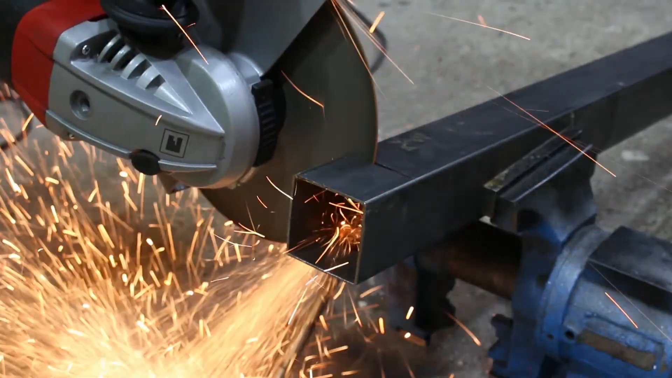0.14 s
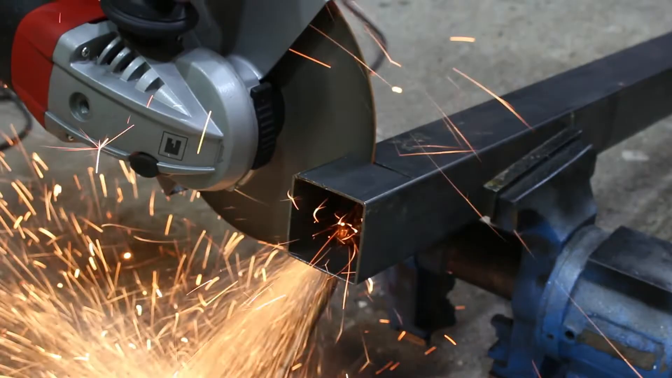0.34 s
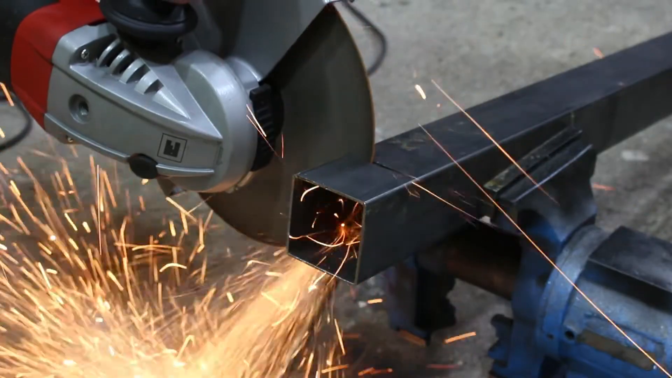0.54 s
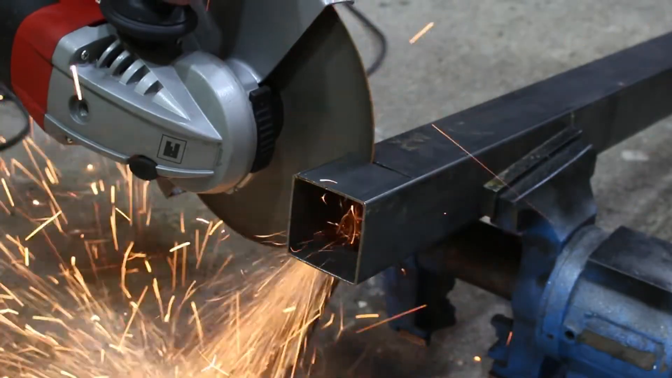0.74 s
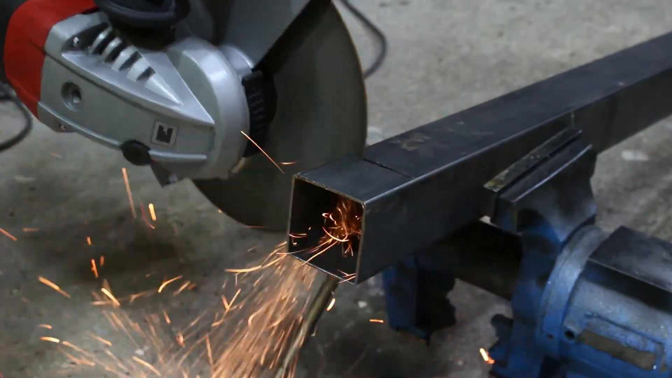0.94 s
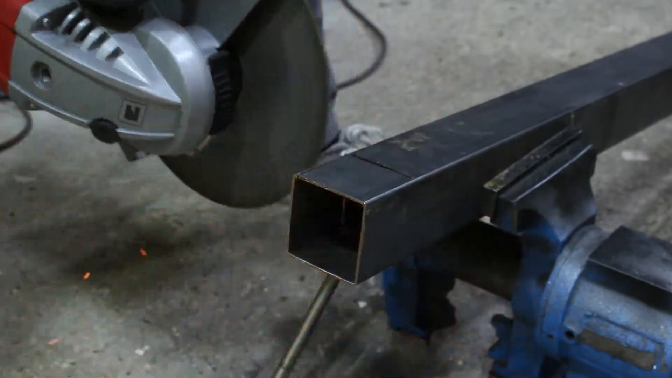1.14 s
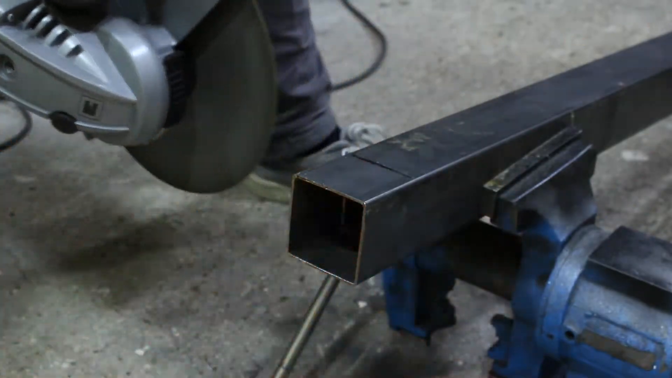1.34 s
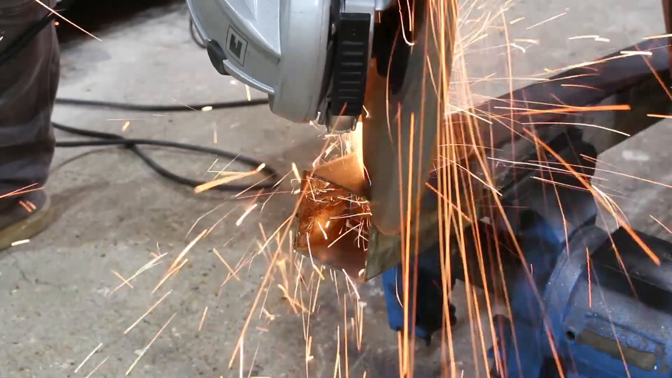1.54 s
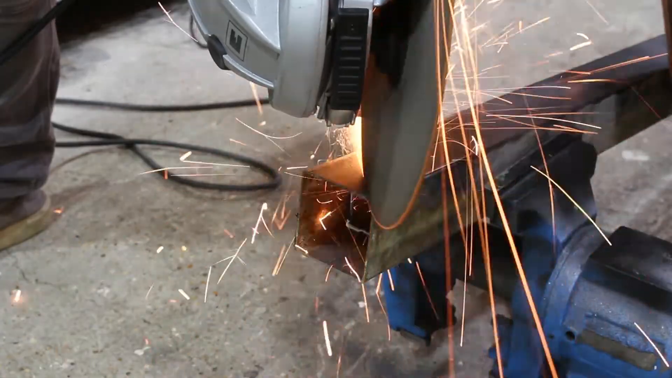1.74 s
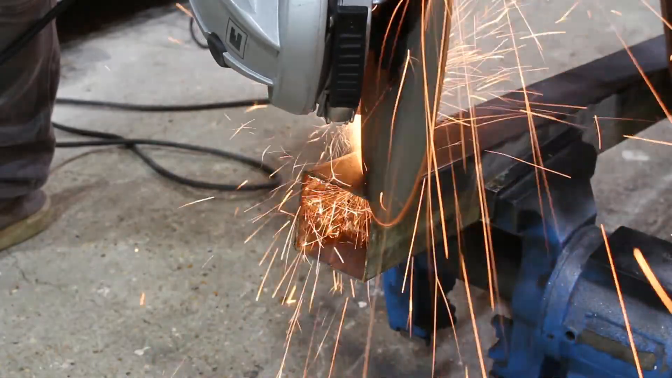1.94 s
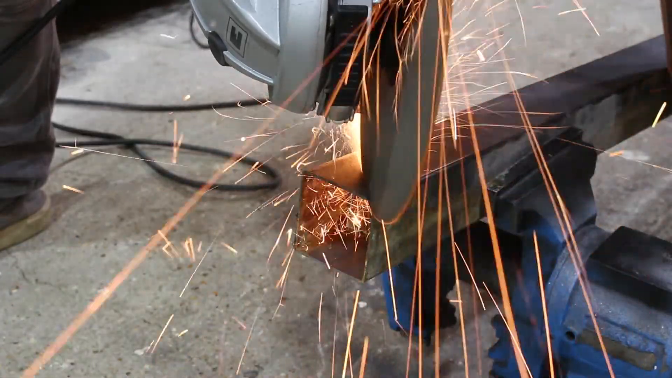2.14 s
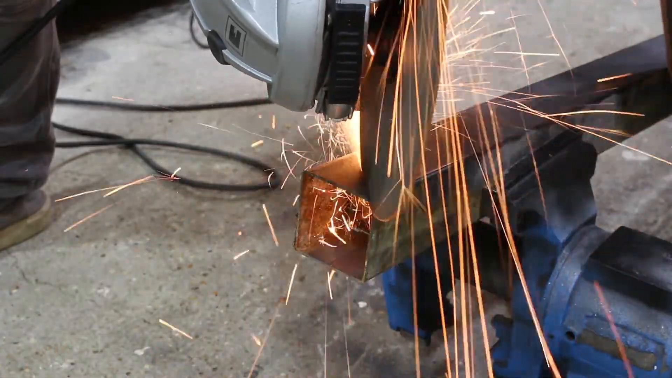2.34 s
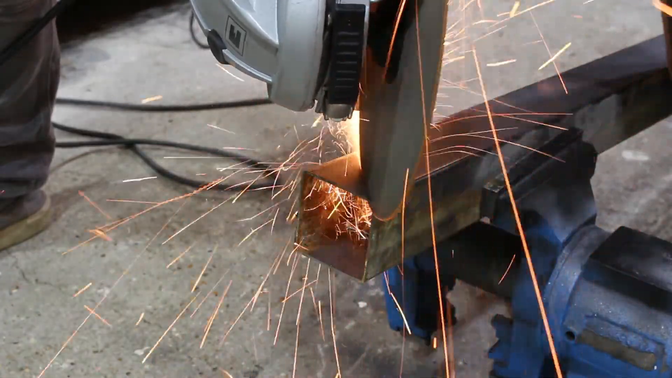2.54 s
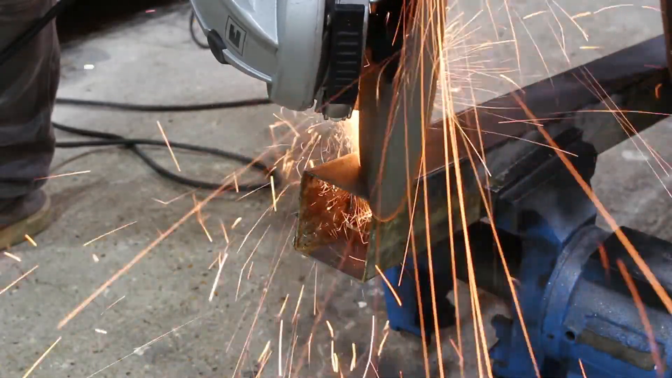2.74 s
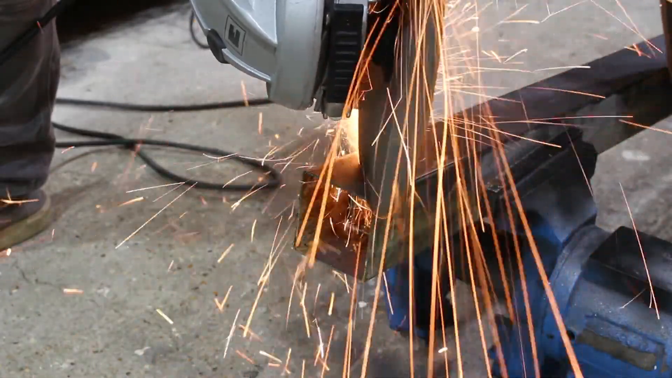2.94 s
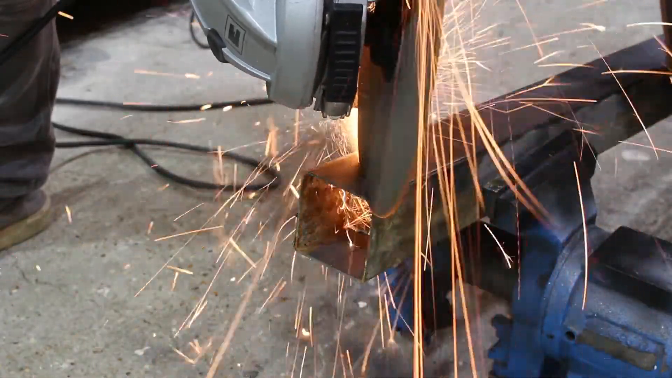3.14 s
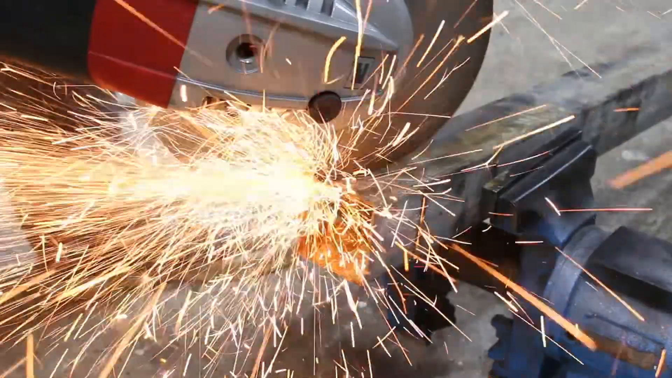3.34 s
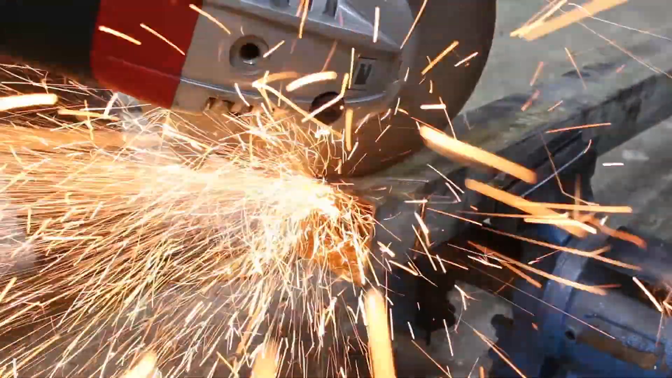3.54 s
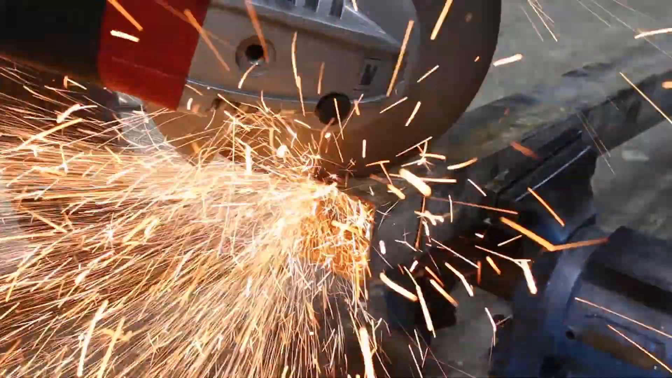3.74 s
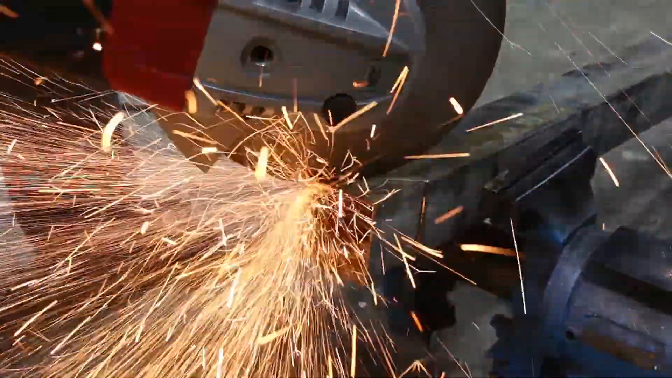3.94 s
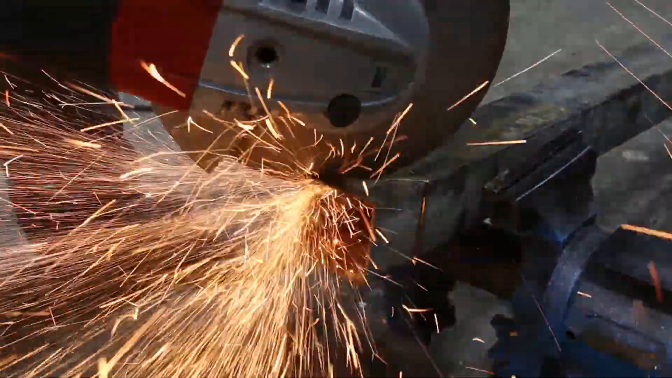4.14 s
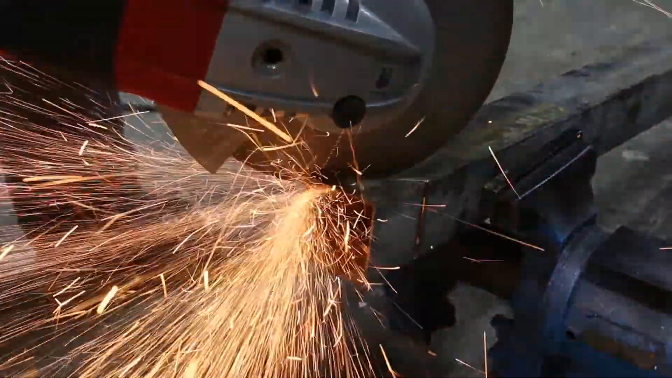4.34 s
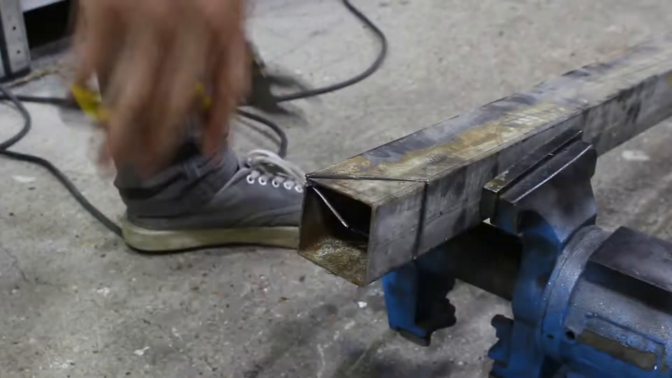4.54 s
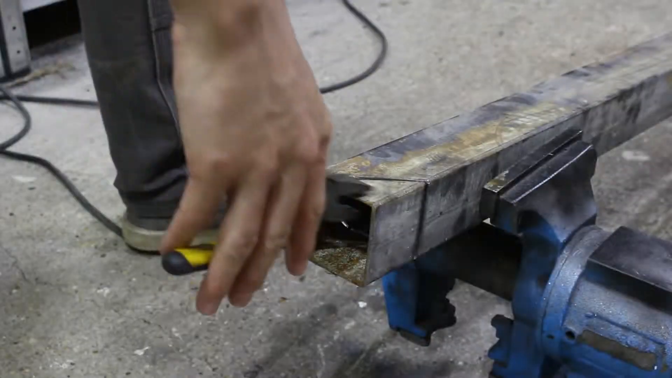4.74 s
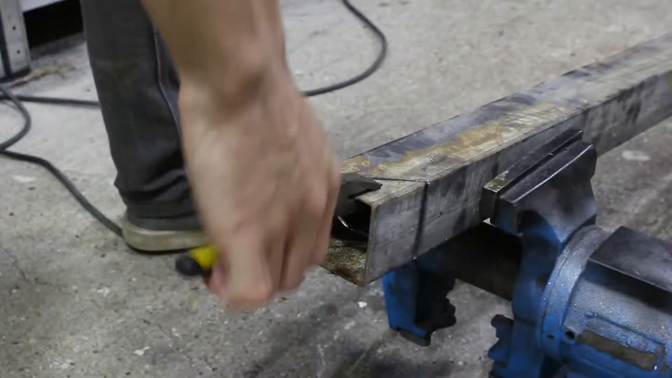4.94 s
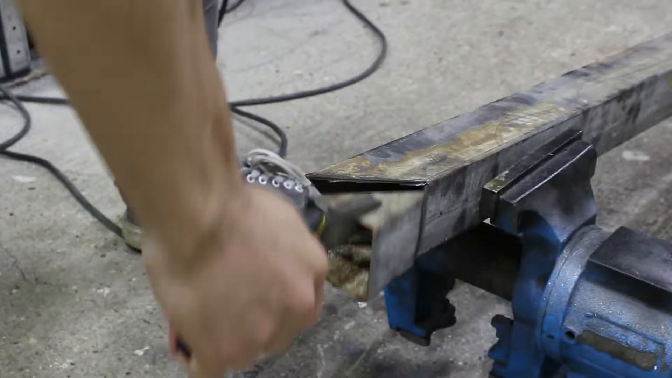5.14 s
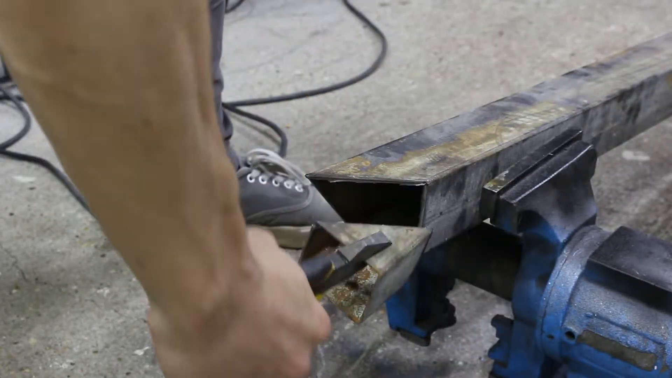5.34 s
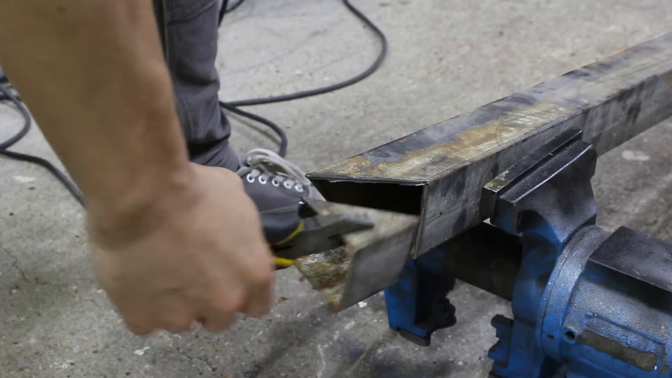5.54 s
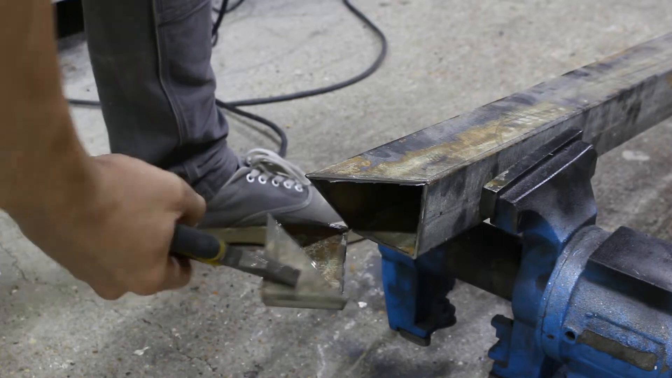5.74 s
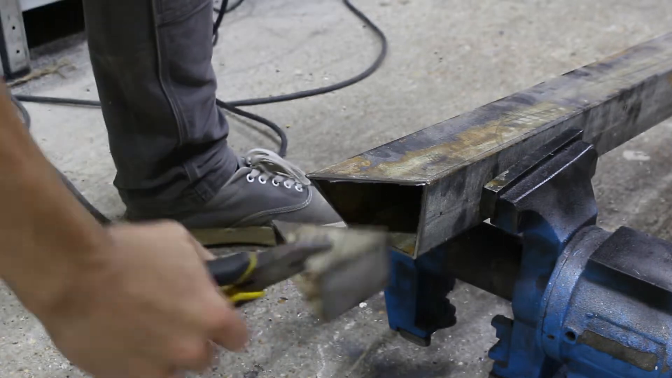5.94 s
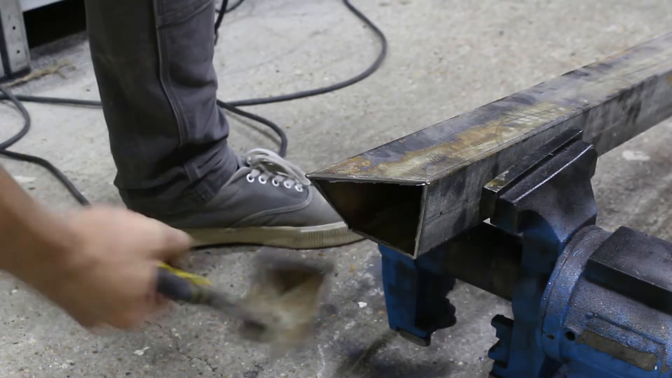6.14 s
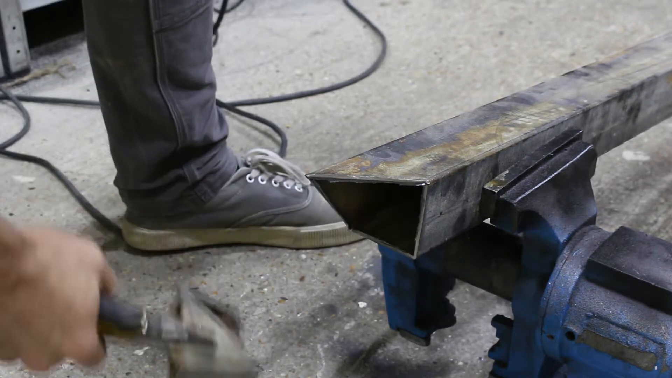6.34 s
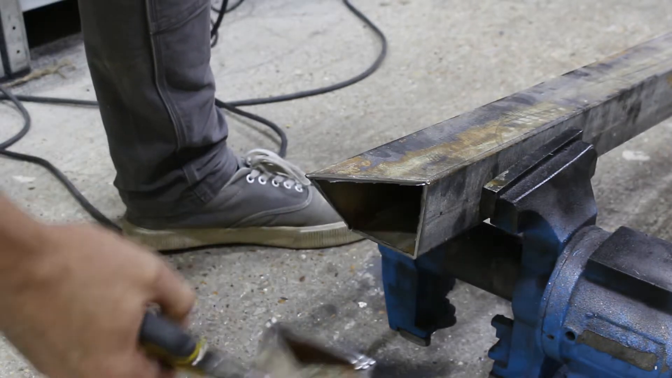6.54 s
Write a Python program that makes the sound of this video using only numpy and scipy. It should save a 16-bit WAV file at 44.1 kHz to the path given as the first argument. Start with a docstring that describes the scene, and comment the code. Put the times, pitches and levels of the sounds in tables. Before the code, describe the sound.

An angle grinder screams through steel tube in three abruptly joined passes, spinning free after the first, then stops; pliers clank and scrape the offcut loose.

```python
"""In a workshop an angle grinder cuts a square steel tube in three passes, spinning free after the first.
The speed and tone jump where the passes join. Grit noise that repeats each turn excites resonances, while
gears, rotor and runout add tones locked to the disc. Then pliers knock, scrape and twist the offcut loose:
noise bursts and damped modes of the steel, with a room tail, over hiss and a low hum. One mono microphone."""
import sys
import numpy as np
from scipy import signal
from scipy.fft import rfft, irfft, next_fast_len
from scipy.io import wavfile
from scipy.ndimage import map_coordinates

SR = 44100
rng = np.random.default_rng(int(sys.argv[2]) if len(sys.argv) > 2 else 0)


def pcm_store(signal):
    """Save signal as 16-bit PCM."""
    levels = np.round(np.clip(np.atleast_2d(signal), -1, 1) * 32767)
    wavfile.write(sys.argv[1], SR, levels.astype(np.int16).T)


N = 290178
T = np.arange(N) / SR  # s


def amp(db):
    """The decibel law: level to amplitude gain."""
    return 10 ** (np.asarray(db) / 20)


def unit(x):
    """Normalisation to an rms of 1."""
    return x / np.sqrt(np.mean(x ** 2) + 1e-20)


def along(points, hz):
    """Interpolation of (Hz, value) points on a logarithmic frequency axis."""
    f, v = np.transpose(points)
    return np.interp(np.log(hz + 1), np.log(f + 1), v)


def curves(rows, t):
    """Linear interpolation in time of each column after the first."""
    s, *columns = np.transpose(rows)
    return [np.interp(t, s, column) for column in columns]


def wobble(rate, t):
    """Slow random modulation: a smooth curve through rate random knots a second."""
    seconds = t - t[0]
    knots = rng.standard_normal(int(seconds[-1] * rate) + 4)
    return map_coordinates(knots, [seconds * rate])


def filtered(x, response):
    """Linear filtering: the spectrum times a response that may be complex."""
    size = next_fast_len(x.shape[-1] + SR // 4)
    spectrum = rfft(x, size) * response(np.fft.rfftfreq(size, 1 / SR))
    return irfft(spectrum, size)[..., :x.shape[-1]]


def modes(rows):
    """Modal superposition: resonances of (Hz, width Hz, dB) summed with alternating sign."""
    def response(f):
        total = 0
        for k, (centre, width, db) in enumerate(rows):
            damping = 1j * f * width
            total = total + (-1) ** k * amp(db) * damping / (centre ** 2 - f ** 2 + damping)
        return total
    return response


# Disc speed, which climbs when the load eases: start_s [s], speed [turns per s]
DISC_SPEED = [(0, 96.7), (.25, 96.5), (.58, 97.28), (.81, 97.7), (1, 98.5), (1.1, 99.9), (1.24, 101.5),
              (1.388, 102.9), (1.389, 93.1), (1.86, 94.1), (2.45, 94.76), (3.269, 94.68), (3.27, 95.5),
              (3.83, 93.8), (4.18, 93.15), (4.35, 92.94), (4.52, 92.92)]
# First cut, free spin, second cut, third cut: start_s [s], end_s [s], share repeating each turn [0-1]
PASSES = [(0, 1.07, 0.4), (1.055, 1.39, 0.05), (1.389, 3.268, 0.47), (3.269, 4.509, 0.55)]
# Each pass at its start and end, before trims: level_db [dB], treble_db [dB], whine_db [dB], drone_db [dB]
PASS_LEVELS = [
    [(-15.5, 6, -33, -34.5), (-16.5, 3, -21.5, -28)],
    [(-17.5, -4, -26, -60), (-19, -1.5, -18, -60)],
    [(-14, 0, -21.5, -40.5), (-15.5, -0.5, -25, -39)],
    [(-12, -4.5, -21, -29.5), (-11, -6, -21, -40)],
]
# Broad relative spectrum of each pass: pitch_hz [Hz], level_db [dB per Hz]
PASS_COLOURS = [
    [(24, -77), (40, -29), (372, -19), (630, -9.5), (873, -6), (2000, -4), (4460, -2), (16000, -13.5)],
    [(40, -46), (350, -27.5), (1400, -15.5), (4300, -12), (7400, -19), (9400, -13.5), (16000, -27)],
    [(24, -78), (40, -34), (1760, -14), (2210, -10), (2770, -11), (3470, -8.5), (13100, -13.5),
     (16000, -30)],
    [(24, -62), (40, -34), (615, -11.5), (873, -7), (2700, -5.5), (3470, -3.5), (12800, -6.5), (16000, -16)],
]
# Resonances of disc, guard and tube, early and late in each pass as the slot deepens:
# pitch_hz [Hz], width_hz [Hz], relative level_db [dB]
PASS_RINGING = [([(2415, 35, -15), (4420, 60, 1), (5525, 45, -4), (9950, 70, -1), (10330, 140, -8)],
                [(881, 9, 2), (4440, 14, 8), (5530, 48, -6), (9620, 50, -8), (10450, 180, -13),
                (11420, 70, -8)]), ([(4465, 14, 5), (5110, 46, -15)], [(4480, 18, -2), (3530, 85, -12)]),
                ([(3600, 130, -13), (5650, 130, -7), (6880, 60, -8), (10640, 250, -7), (12700, 900, -17)],
                [(3500, 120, -10), (5500, 100, -7), (7100, 200, -10), (9000, 40, -7), (13000, 900, -17)]),
                ([(3300, 300, -8), (4700, 400, -3), (6000, 120, -5), (6620, 30, -5), (8900, 60, -10)],
                [(3150, 100, -12), (3600, 350, -3), (4600, 400, -11), (5680, 60, -7), (8740, 80, -9)])]


def grinder():
    """Forced vibration: grit excites disc and tube, while tones stay locked to multiples of the disc speed."""
    out = np.zeros(N)
    angle = 2 * np.pi * np.cumsum(curves(DISC_SPEED, T)[0]) / SR  # radians turned by the disc
    passes = zip(PASSES, PASS_LEVELS, PASS_COLOURS, PASS_RINGING)
    for (start, end, share), (first, last), colour, (early, late) in passes:
        span = slice(round(start * SR), round(end * SR))
        t, turn = T[span], angle[span]
        level_db, treble_db, whine_db, drone_db = np.linspace(first, last, len(t)).T
        force = grit_force(t, turn, share)
        mesh = GEAR_TEETH * turn + 0.6 * wobble(60, t)
        out[span] = amp(level_db - 1.5) * cutting(force, mesh, colour, early, late, treble_db)
        out[span] += gear_whine(t, turn, mesh, whine_db)
        out[span] += drone(t, turn, drone_db)
    return out + squeals(angle)


def grit_force(t, turn, share):
    """Periodic plus random excitation: part of the grit noise recurs each turn, the rest never repeats."""
    pattern = rim(t, turn / (2 * np.pi), wear_s=0.1535)
    repeating = filtered(pattern, lambda hz: 1 - 0.5 / (1 + (hz / 1800) ** 4))
    noise = rng.standard_normal(len(t))
    fresh = filtered(noise, lambda hz: 1 - 0.51 / (1 + (8000 / (hz + 1)) ** 4))
    force = np.sqrt(share) * repeating + np.sqrt(1 - share) * fresh
    return force * amp(0.63 * wobble(13.8, t))


def rim(t, turns, wear_s, count=175, size=2048):
    """Quasi-periodicity: the grit pattern round the disc returns every turn and wears into a new one."""
    knots = int((t[-1] - t[0]) / wear_s) + 4
    harmonics = rng.standard_normal((knots, count)) + 1j * rng.standard_normal((knots, count))
    pattern = irfft(harmonics, size)
    position = [(t - t[0]) / wear_s + 1, turns % 1 * size]
    return unit(map_coordinates(pattern, position, mode="grid-wrap"))


def cutting(force, mesh, colour, early, late, treble_db):
    """Source and resonator: torn steel gives coloured noise and the parts ring at their modes."""
    depth = np.linspace(0, np.pi / 2, len(force))  # crossfade angle
    early_ring = np.cos(depth) * filtered(force, modes(early))
    late_ring = np.sin(depth) * filtered(force, modes(late))
    ring = unit(early_ring + late_ring)
    tear = unit(filtered(force, lambda hz: amp(along(colour, hz)))) + amp(-1) * ring
    # Each tooth jolts the ringing: amplitude modulation makes sum tones in the treble
    beat = amp(-7) * ring * np.sin(mesh)
    # Split at 7 kHz
    high = filtered(tear + beat, lambda hz: 1 / (1 + (7000 / (hz + 1)) ** 6))
    low = filtered(tear, lambda hz: 1 - 1 / (1 + (7000 / (hz + 1)) ** 6))
    return (low + amp(treble_db) * high) / np.std(low)


GEAR_TEETH, PINION_TEETH = 47, 12


def gear_whine(t, turn, mesh, whine_db):
    """Gear meshing: a tone at the tooth rate with its octave, and one at the rotor's faster turning rate."""
    gears = np.sin(mesh) + amp(-17) * np.sin(2 * mesh)
    rotor = amp(-42.5 + 0.53 * wobble(7.6, t)) * np.sin(GEAR_TEETH / PINION_TEETH * turn)
    return amp(whine_db + 2.4 * wobble(11.1, t)) * gears + rotor


# Tones of a disc running out of true: multiple of disc speed [1], level_db relative to the drone [dB]
DRONE_TONES = [(2, -12), (3, -17), (5, -15), (6, -9), (7, -13), (8, -14), (9, -8)]


def drone(t, turn, drone_db):
    """Rotating imbalance: a disc out of true sounds low harmonics of its speed."""
    return sum(amp(drone_db + db + 2.0 * wobble(7.5, t)) * np.sin(k * turn) for k, db in DRONE_TONES)


# Clear tones: start_s [s], end_s [s], multiple of disc speed [1], level_db before the wobble [dB rms]
SQUEAL_TONES = [(0, .85, 46, -30), (-.1, .75, 25, -31), (1.389, 3.3, 24, -27), (1.92, 2.15, 24, -29),
                (1.85, 2.15, 22, -31), (1.389, 1.76, 37, -16.5), (1.45, 1.72, 38, -27),
                (1.72, 1.87, 39, -26), (1.85, 2.45, 37, -27), (2.4, 2.76, 37, -20), (2.47, 2.75, 38, -24),
                (2.6, 3.22, 36, -20), (3.27, 3.45, 51, -20), (3.27, 3.52, 34, -21), (3.27, 3.45, 33, -24),
                (3.48, 3.66, 36, -20), (3.6, 3.8, 35, -22), (3.5, 3.76, 48, -26), (3.65, 4.1, 49, -26),
                (3.3, 3.68, 70, -28), (3.48, 3.65, 61, -24), (3.6, 3.92, 64, -20), (3.9, 4.18, 55, -26),
                (3.88, 4.3, 38, -19), (4.02, 4.2, 26, -27), (3.75, 4.02, 34, -27), (4.1, 4.51, 34, -23),
                (4.25, 4.42, 40, -24), (4.27, 4.42, 54, -25), (4.25, 4.51, 37, -25)]


def squeals(angle):
    """Harmonic locking: multiples of the disc speed swell into clear tones and sink again."""
    out = np.zeros(N)
    for start, end, multiple, db in SQUEAL_TONES:
        swell = np.sin(np.pi * np.clip((T - start) / (end - start), 0, 1)) ** 0.3
        level = np.sqrt(2) * amp(db + 1.2 * wobble(12, T))
        out += level * swell * np.sin(multiple * angle + 0.25 * wobble(20, T))
    return out


# Modes of the offcut and tube, also used by scrape(): pitch_hz [Hz], relative level_db [dB], t60_s [s]
STEEL_MODES = [(400, -10, .1), (770, 0, .2), (930, -3, .2), (1330, -11, 1.2), (1437, -11, 1),
               (1800, -14, 1.6), (2019, -6, .3), (2400, -4, .33), (2500, -4, .3), (2790, -2, .4),
               (3260, -9, .3), (3378, -3, .5), (3558, -5, .2), (4624, -3, .22), (5800, -5, .3),
               (7620, -9, .12)]
# Touches of pliers and offcut, before trims: start_s [s], level_db [dB], crack_db relative to it [dB],
# damping as a share of t60 [1], strongest near pitch_hz [Hz]
KNOCKS = [(4.542, -34, -20, 0.13, 2800), (4.837, -22, -20, 1, 950), (4.883, -2, -21, 0.27, 2900),
          (5.155, -1.5, -16, 0.12, 2330), (5.255, -13, -40, 1.3, 1250), (5.587, -25.5, -6, 0.62, 2300),
          (5.769, -29, -12, 0.088, 3880), (5.804, -30, -26, .08, 2600), (5.825, -19, -11, 0.8, 2900),
          (5.861, -24, -5, 0.65, 3400), (5.88, -25, -20, .6, 2900), (6.039, -24, -36, 0.04, 1450),
          (6.077, -28.5, -18, 1.2, 2420), (6.088, -25, -4, 0.21, 3560), (6.354, -28, -47, 0.057, 1500),
          (6.164, -8, -28, .6, 3100)]
# Dull bumps: start_s [s], level_db at onset [dB]
THUDS = [(5.172, -14), (5.435, -25), (5.889, -20), (5.915, -16.5), (5.945, -24), (6.224, -18.5)]


def knocks():
    """Impact excitation: contacts crack, clatter and ring the modes that the touched spot favours."""
    out, t = np.zeros(N + SR), T[:SR // 2]
    hz, mode_db, t60 = np.transpose(STEEL_MODES)[:, :, None]
    for s, db, crack_db, damp, near in KNOCKS:
        octaves = 1.5 + db / 30  # a harder blow reaches more modes
        favour = lambda f: amp(-6 * (np.log2((f + 1) / near) / octaves) ** 2)
        spread_db = rng.normal(0, 2.5, hz.shape)
        strength = amp(mode_db + spread_db - 60 * t / (t60 * damp)) * favour(hz)
        drift = np.cumsum(rng.normal(0, 0.015, strength.shape), axis=1)  # phase, radians
        tones = strength * np.sin(2 * np.pi * hz * t + drift)
        ring = ((1 - np.exp(-t / 0.0004)) * tones).sum(axis=0)
        burst = unit(filtered(rng.standard_normal(len(t)), favour))
        # Light touches ring cleaner: the long part of the clatter shrinks with level
        clatter = burst * (amp(-60 * t / 0.012) + amp(db / 2 - 60 * t / (0.25 * damp)))
        bright = np.diff(rng.standard_normal(len(t) + 1))
        crack = bright * (amp(-60 * t / 0.015) + amp(-19.0 - 60 * t / 0.18))
        knock = amp(db - 15) * ring + amp(db - 10.5) * clatter + amp(db + crack_db + 1) * crack
        out[round(s * SR):][:len(t)] += knock
    for s, db in THUDS:
        out[round(s * SR):][:len(t)] -= amp(db) * np.sin(2 * np.pi * 330 * t) * amp(-60 * t / 0.0076)
    return out[:N]


# Steel dragged on steel; the first row is the grinder's sound dying away. Before trims:
# peak_s [s], rise_s [s], level_db at the peak [dB], treble_db relative to it [dB], fade [dB per s]
SCRAPES = [(4.511, 0.0048, -40.5, 11.5, 99), (4.845, 0.0086, -19.5, -13, 46.5),
           (4.89, 0.011, -17.5, -31, 126), (5.061, 0.015, -15, -9, 191), (5.164, 0.011, -13.5, -6.5, 131),
           (5.265, 0.047, -31, 12, 140), (5.894, 0.048, -33.5, -6, 302)]
# Relative spectrum of the scrape's body: pitch_hz [Hz], level_db [dB per Hz]
SCRAPE_BODY = [(150, -29), (350, -12.5), (700, -8), (1300, -2), (2600, 3.5), (3900, -4.5), (5500, -55)]
# Relative spectrum of the scrape's treble: pitch_hz [Hz], level_db [dB per Hz]
SCRAPE_TREBLE = [(3500, -14.5), (5900, -6.5), (8400, -23), (12800, -12.5), (16000, -29)]
RISE_DB, TREBLE_FADES = 5, 1.38  # climb up to the peak; how many times faster the treble fades


def scrape():
    """Friction noise: after the grinder's fading tail, uneven slips of a burr shake the steel, which rings on."""
    steel = modes([(hz, 9 / t60, db) for hz, db, t60 in STEEL_MODES])
    body, treble = np.zeros(N), np.zeros(N)  # power envelopes
    for s, rise, db, treble_db, fade in SCRAPES:
        before = np.clip(s - T, 0, None) / rise
        after = np.clip(T - s, 0, None) * fade
        begun = before < 1
        body += begun * amp(db - RISE_DB * before - after) ** 2
        treble += begun * amp(db + treble_db - RISE_DB * before - TREBLE_FADES * after) ** 2
    noise = rng.standard_normal(N) * amp(2.5 * wobble(350, T))  # slips too dense to tell apart
    low = np.sqrt(body) * unit(filtered(noise, lambda hz: amp(along(SCRAPE_BODY, hz))))
    high = np.sqrt(treble) * unit(filtered(noise, lambda hz: amp(along(SCRAPE_TREBLE, hz))))
    ring = filtered(low + amp(-0.5) * high, steel)
    ring *= np.linalg.norm(low) / np.linalg.norm(ring)
    return amp(-8) * (low + high) + amp(-4) * ring


# Decay of the room's tail: pitch_hz [Hz], t60_s [s]
WALL_DECAY = [(1000, 0.41), (10000, 0.21)]


def walls(x):
    """Reverberation: convolution with a noise tail whose frequencies each decay at their own rate."""
    hz, t, z = signal.stft(rng.standard_normal(SR // 2), SR, nperseg=256)
    decay = amp(-60 * t / along(WALL_DECAY, hz)[:, None])
    tail = signal.istft(z * decay, SR, nperseg=256)[1]
    return signal.fftconvolve(x, tail / np.linalg.norm(tail))[:N]


# Relative spectrum of the workshop's hiss: pitch_hz [Hz], level_db [dB per Hz]
ROOM_HISS = [(15, -34), (25, -15.5), (70, -21.5), (263, -21.5), (363, -22.5), (463, -26), (1330, -31.5),
             (16000, -50.5)]
# Low hum, before a trim: pitch_hz [Hz], level_db [dB]
HUM_TONES = [(49.7, -35), (78, -45.5)]


def workshop():
    """Background noise: shaped hiss and a wavering low hum, heard once the grinder is off."""
    noise = rng.standard_normal(N)
    hiss = amp(-46.5) * unit(filtered(noise, lambda hz: amp(along(ROOM_HISS, hz))))
    hum = np.zeros(N)
    for hz, db in HUM_TONES:
        level = amp(db - 4.0 + 1.5 * wobble(9, T))
        hum += level * np.sin(2 * np.pi * hz * T + 0.5 * wobble(6.1, T))
    return (hiss + hum) * (T >= PASSES[-1][1])


def scene():
    """Superposition and soft saturation: the loud grinder overdrives the input; all sources sit centrally."""
    hands, loud = knocks() + scrape(), grinder()
    loud = loud / (1 + np.abs(loud / 0.52) ** 4) ** (1 / 4)
    return np.tile(loud + hands + amp(-5.5) * walls(hands) + workshop(), (2, 1))


def record(dry):
    """Band limitation: a mono microphone passes nothing from 15.9 kHz up."""
    return filtered(dry, lambda hz: hz < 15900)


dry = scene()
out = record(dry)
pcm_store(out)
```